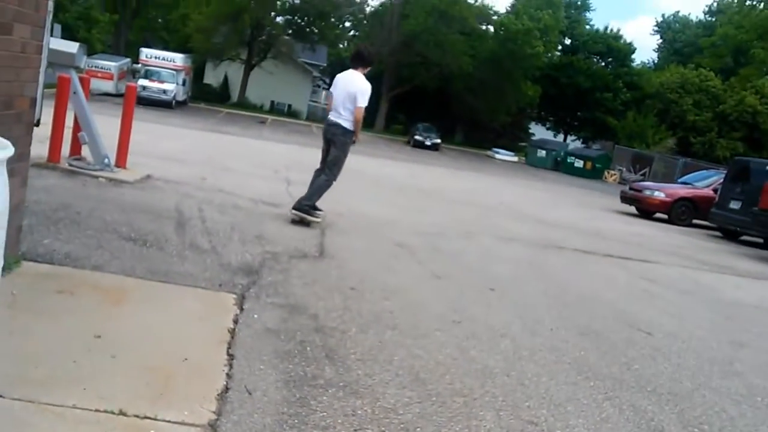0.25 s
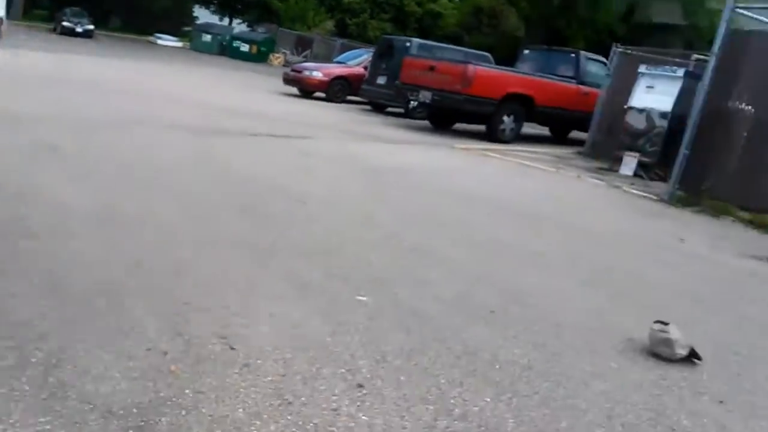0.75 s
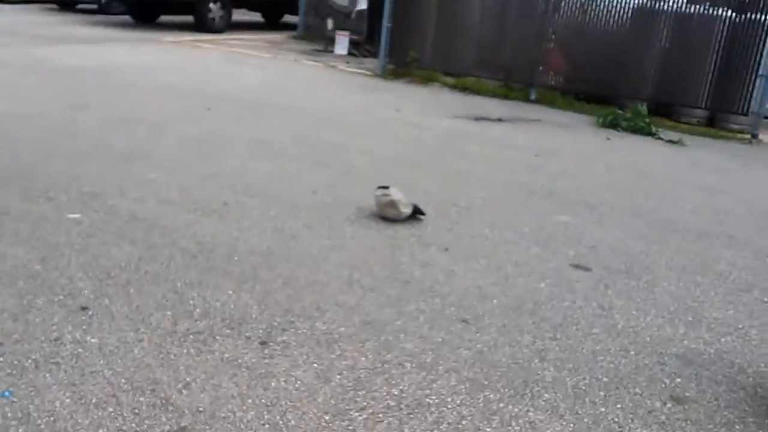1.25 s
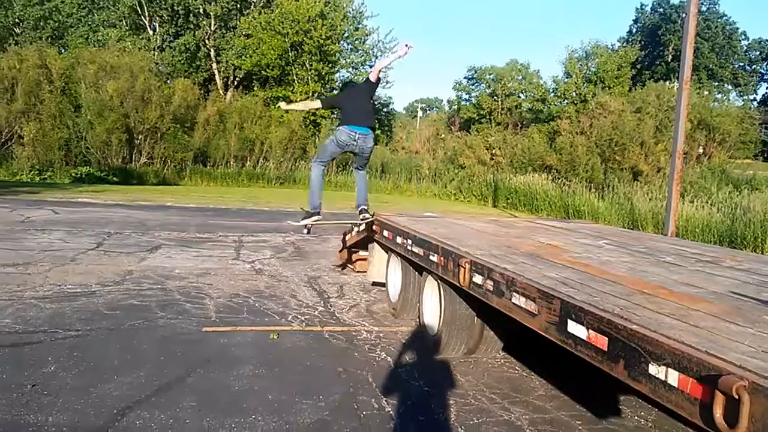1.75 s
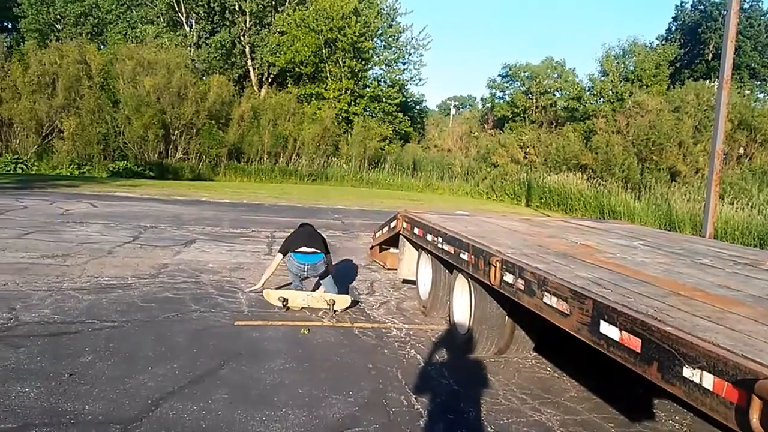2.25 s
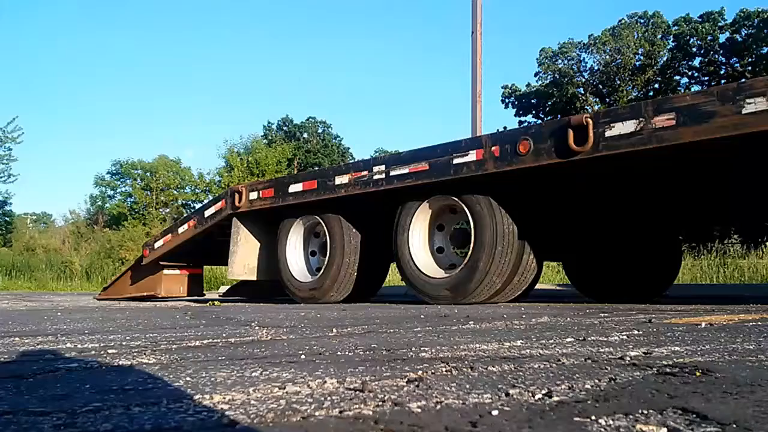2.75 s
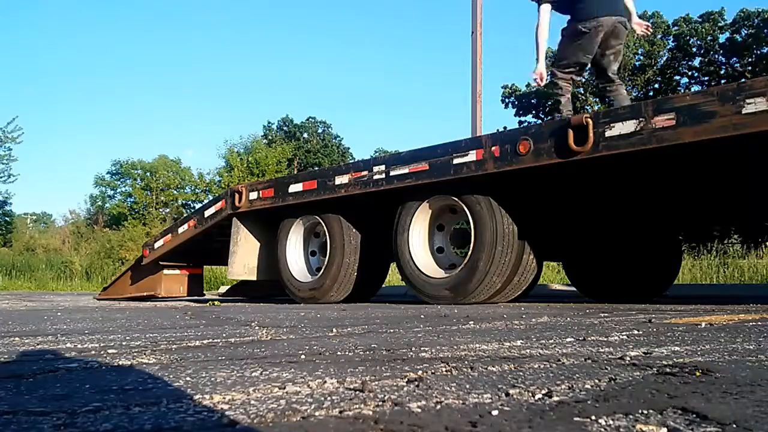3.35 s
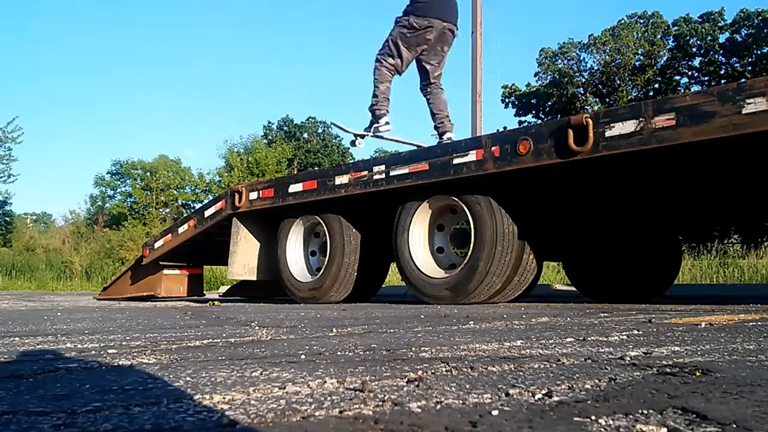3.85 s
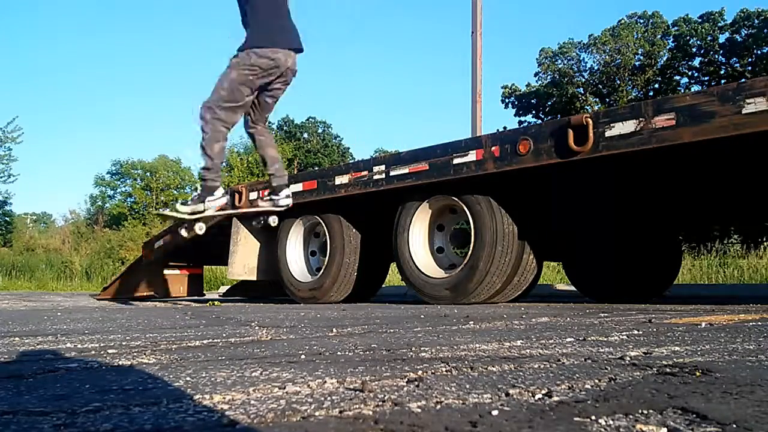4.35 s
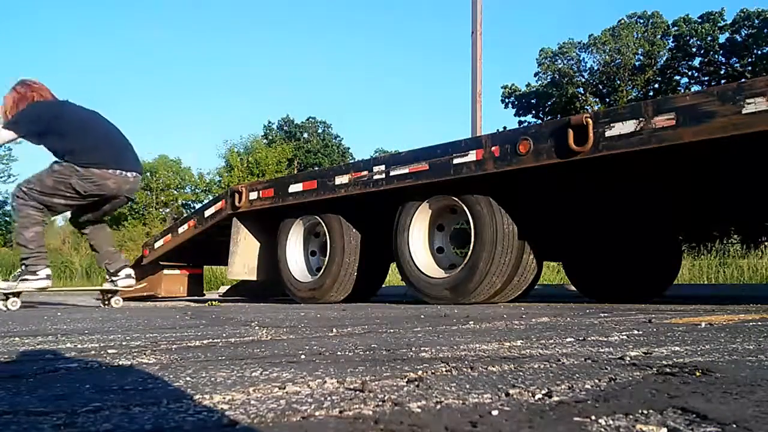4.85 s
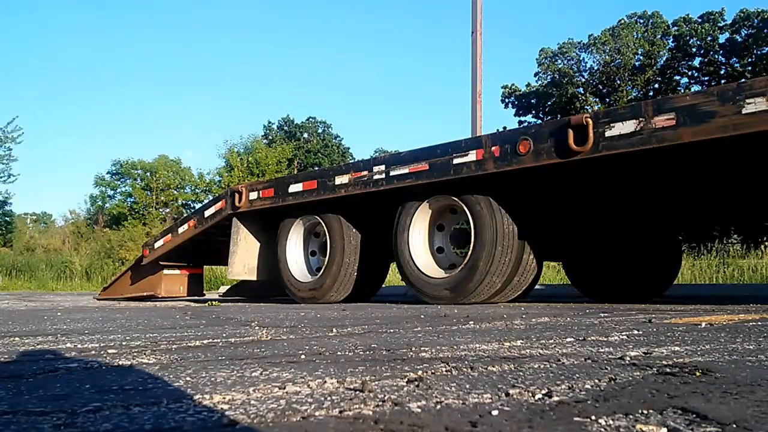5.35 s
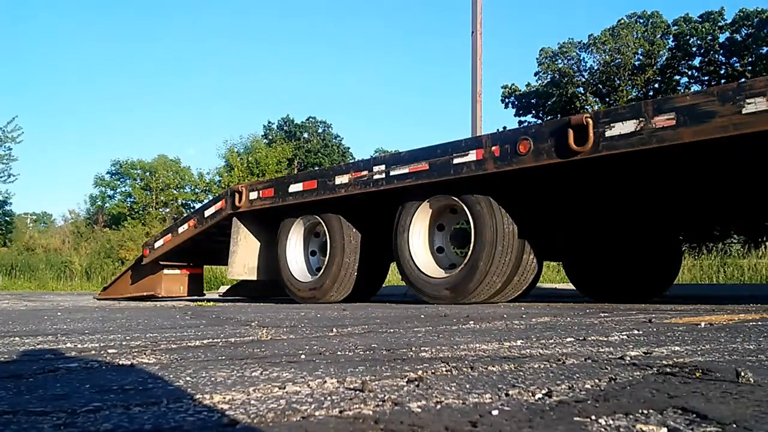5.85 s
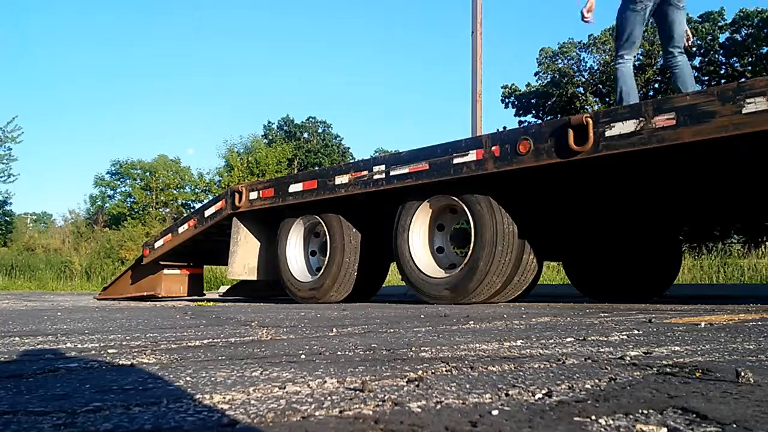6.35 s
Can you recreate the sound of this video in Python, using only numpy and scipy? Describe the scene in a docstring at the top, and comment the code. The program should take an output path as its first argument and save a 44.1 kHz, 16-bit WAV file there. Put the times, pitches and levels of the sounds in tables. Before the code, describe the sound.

Skateboard wheels roar over rough asphalt, knocks crack up close, silence, then clattering falls, plank rumble, a hard slamming landing and rolling away in wind.

```python
"""Skateboarding in a parking lot

Four passages joined by hard cuts, with silence after the first. Wheels roll on coarse asphalt (random
impacts, coloured and combed by a ground bounce) while knocks sound near the microphone; a rider lands and
falls; a board rumbles along a flatbed trailer's planks (noise through wooden resonances), pops off, slams
down (noise bursts and ringing modes) and rolls away; the next run starts.
Wind gusts run throughout; a murmur of air and a meadow's high hiss join after the silence (filtered noise)."""
import sys
import numpy as np
from scipy import signal
from scipy.fft import rfft, irfft, next_fast_len
from scipy.io import wavfile
from scipy.ndimage import uniform_filter1d, map_coordinates

SR = 44100
rng = np.random.default_rng(int(sys.argv[2]) if len(sys.argv) > 2 else 0)


def digitize_waveform(pressure):
    """Quantize a signal to 16-bit integers and store it at the path in sys.argv[1].

    Rows of a 2-D input are taken as channels; values are limited to [-1, 1].
    """
    field = np.atleast_2d(pressure).T
    bounded = np.clip(field, -1, 1)
    quanta = np.round(bounded * 32767).astype(np.int16)
    wavfile.write(sys.argv[1], SR, quanta)


N = 291499

# cuts [s]: the first passage ends, the second, third and fourth start
LOT_END, FALL_START, RUN_START, NEXT_START = 1.548, 2.099, 2.777, 5.778
# the hard landing, truck by truck and foot by foot: (time [s], level [dB], body relative to level [dB])
LANDING = [(4.5995, -6, -3), (4.604, -12.5, 6.5), (4.615, -6.5, 3.5), (4.620, -9, 2.5), (4.628, -12, 10.5),
           (4.66, -25, 12)]
# modes of board and trucks: (frequency [Hz], relative level [dB], t60 [s])
BOARD = [(587, -2.5, 0.058), (668, -3.5, 0.14), (892, -1.5, 0.031), (1040, -11, 0.044), (1496, -2.5, 0.15),
         (1698, -3, .1), (2062, -1, 0.052), (2650, -6.5, 0.043), (3290, -5.5, 0.15), (4020, -11.5, .08),
         (4300, -9.5, 0.23), (4750, -10.5, 0.15), (5110, -7, .17)]
# spectrum of crunching grit: (frequency [Hz], relative density [dB])
GRIT = [(700, -8), (1500, 5.5), (2600, -1), (3500, -0.5), (4700, 0), (5600, -6.5), (6800, -25.5),
        (10000, -39), (15500, -58)]
# spectrum of a dull woody body: (frequency [Hz], relative density [dB])
BODY = [(50, -11.5), (160, -5), (280, -3), (450, -2), (620, 4), (770, 0), (940, 2), (1270, -9.5),
        (1500, -10), (2100, -15.5), (2700, -26.5), (12000, -73.5)]


def amp(db):
    """Level law: decibels to an amplitude ratio."""
    return 10 ** (np.asarray(db) / 20)


def unit(x):
    """Normalization: scale to an rms of 1."""
    return x / np.sqrt(np.mean(x ** 2) + 1e-20)


def along(points, hz):
    """Interpolation of (frequency [Hz], value) points on a logarithmic frequency axis."""
    f, v = np.transpose(points)
    return np.interp(np.log(hz + 1), np.log(f), v)


def curves(rows):
    """Linear interpolation in time: one value per sample for each column after the time."""
    s, *columns = np.transpose(rows)
    return [np.interp(np.arange(N) / SR, s, column) for column in columns]


def shot(start, end):
    """Gating: 1 between two moments [s], 0 outside, with edges smoothed over 64 samples."""
    t = np.arange(N) / SR
    return uniform_filter1d(1. * ((t >= start) & (t < end)), size=64)


def wobble(rate):
    """Slow random modulation: a smooth curve through rate random knots a second."""
    knots = rng.standard_normal(int(N * rate / SR) + 4)
    return map_coordinates(knots, [np.arange(N) * rate / SR])


def coloured(x, spectrum):
    """Minimum-phase filtering: the cepstrum folded to positive times makes a causal, unit-power filter."""
    size = 8192
    gain = amp(along(spectrum, np.fft.rfftfreq(size, 1 / SR)))
    cepstrum = irfft(np.log(unit(gain)))
    cepstrum[1:size // 2] *= 2
    cepstrum[size // 2 + 1:] = 0
    impulse_response = irfft(np.exp(rfft(cepstrum)))
    return signal.fftconvolve(x, impulse_response)[:len(x)]


def noise():
    """White noise: equal power at all frequencies, about rms 1."""
    return rng.standard_normal(N)


def stones(rate, spread_db):
    """Shot noise: tiny impacts of random size, about rate a second, at rms 1."""
    struck = rng.random(N) < rate / SR
    return unit(struck * noise() * amp(spread_db * noise()))


def bursts(rows):
    """Exponential decay: dying noise bursts (time [s], level [dB], t60 [s])."""
    out, t = np.zeros(N + SR), np.arange(SR // 2) / SR
    for s, db, t60 in rows:
        decay = amp(db - 60 * t / max(t60, .003))
        out[round(s * SR):][:len(t)] += decay * rng.standard_normal(len(t))
    return out[:N]


def ringing(rows, modes, scatter_db, blur):
    """Modal excitation: blows (time [s], level [dB]) ring the modes; shifting contact blurs their pitch."""
    out, t = np.zeros(N + SR), np.arange(SR // 2) / SR
    hz, level, t60 = np.transpose(modes)[:, :, None]
    for s, db in rows:
        strength = amp(db + level + scatter_db * rng.standard_normal(hz.shape))
        size = strength * rng.choice([-1, 1], hz.shape)
        steps = rng.standard_normal((len(hz), len(t)))
        drift = blur * np.sqrt(hz / SR) * np.cumsum(steps, axis=1)  # random walk of phase
        partials = size * amp(-60 * t / t60) * np.sin(2 * np.pi * hz * t + drift)
        out[round(s * SR):][:len(t)] += np.sum(partials, axis=0)
    return out[:N]


def drone(hz, width_hz):
    """Amplitude modulation: slow complex noise carried on a given pitch becomes a narrow band."""
    carrier = np.exp(2j * np.pi * np.cumsum(hz) / SR)
    return unit(np.real((wobble(width_hz) + 1j * wobble(width_hz)) * carrier))


def swells(rows, rise_db_per_s, fall_db_per_s):
    """Power summation of gains (time [s], hold [s], level [dB]): each rises, holds and dies away."""
    t = np.arange(N) / SR
    power = 0
    for s, hold, db in rows:
        rise_db = -rise_db_per_s * np.maximum(s - t, 0)
        fall_db = -fall_db_per_s * np.maximum(t - s - hold, 0)
        power = power + amp(db + rise_db + fall_db) ** 2
    return np.sqrt(power)


def outdoors():
    """Turbulence noise: gusts buffet the microphone over its hiss; later air murmurs and a meadow hisses."""
    # gusts on the microphone: (time [s], hold [s], level [dB])
    gusts = [(.65, .6, -41.5), (2.2, .5, -39.5), (3.02, .6, -31.5), (4.05, 0.26, -30.5),
             (4.85, 0.11, -36.5), (5.71, .1, -36), (6.06, 0.61, -24.5)]
    # swells of the meadow's hiss: (time [s], hold [s], level [dB])
    hiss_swells = [(3.4, 0.91, -62.5), (4.48, 0.8, -53.5)]
    # spectra of wind buffeting, meadow hiss and murmuring air: (frequency [Hz], relative density [dB])
    buffet_spectrum = [(18, -45.5), (30, -21), (42, -7), (58, 6), (85, 4.5), (130, 1), (250, -4.5),
                       (600, -66.5)]
    meadow_spectrum = [(2800, -21), (3900, -9), (4700, 7), (5300, 0.5), (5900, -9), (6800, -38),
                       (10000, -47)]
    air_spectrum = [(60, 7.5), (400, 9.5), (900, 5.5), (1600, -2), (2900, -7.5), (5000, -7), (7000, -28),
                    (15500, -42.5)]
    calm_db, meadow_db = -41.5, -63.5  # floors between the gusts and between the hiss swells
    buffet = np.hypot(amp(calm_db), swells(gusts, rise_db_per_s=92, fall_db_per_s=66))
    hiss = np.hypot(amp(meadow_db), swells(hiss_swells, rise_db_per_s=119, fall_db_per_s=89))
    wind = buffet * amp(0.62 * wobble(15)) * unit(coloured(noise(), buffet_spectrum))
    meadow = hiss * amp(0.78 * wobble(8.7)) * coloured(noise(), meadow_spectrum)
    murmur = amp(-48.5) * coloured(noise(), air_spectrum)
    self_noise = amp(-66.5) * noise()
    return wind + self_noise + shot(FALL_START, N / SR) * (meadow + murmur)


def yard(x):
    """Diffuse reverberation: scattered echoes from trailer, walls and trees, 9 ms after the sound."""
    # reverberation time: (frequency [Hz], t60 [s])
    echo_t60 = [(150, .4), (1000, 0.36), (5000, 0.15), (10000, .15)]
    hz, t, z = signal.stft(rng.standard_normal(SR // 2), SR, nperseg=256)
    decay = amp(-60 * t / along(echo_t60, hz)[:, None])
    tail = signal.istft(z * decay, SR, nperseg=256)[1]
    delayed = np.pad(x, (round(0.009 * SR), 0))
    return signal.fftconvolve(delayed, tail / np.linalg.norm(tail))[:N]


def near_knocks():
    """Impact excitation: sharp cracks and hollow thocks close by, each with a low ringing thud."""
    # knocks: (time [s], crack level [dB], thock level [dB], thud level [dB], t60 of crack and thock [s])
    knocks = [(1.122, -1, -12, -3.5, 0.011), (1.130, -11, -12, -3.5, 0.05), (1.1331, -21, -29.5, -16, 0.2),
              (1.154, -19.5, -25.5, -15.5, .07), (1.1629, -10.5, -3.5, -11.5, 0.019)]
    # what rings in the knocks: (frequency [Hz], relative level [dB], t60 [s])
    knock_modes = [(105, -2.5, 0.055), (140, -7.5, 0.015), (3940, -18.5, 0.058)]
    # spectra of crack and thock: (frequency [Hz], relative density [dB])
    crack_spectrum = [(100, -10.5), (400, -3.5), (1100, 3.5), (2000, 1), (3000, -0.5), (4300, -3.5),
                      (6000, -14.5), (8000, -24), (11000, -36), (15500, -52.5)]
    thock_spectrum = [(60, -13), (230, 5), (450, 3.5), (900, 2), (1500, -12), (3000, -26.5), (15000, -66)]
    s, crack_db, thock_db, thud_db, t60 = np.transpose(knocks)
    crack = coloured(bursts(zip(s, crack_db, t60)), crack_spectrum)
    thock = coloured(bursts(zip(s, thock_db, t60)), thock_spectrum)
    thud = ringing(zip(s, thud_db), knock_modes, scatter_db=1, blur=.1)
    return crack + thock + thud


def lot_roll():
    """Comb interference: a delayed ground bounce colours the roar of wheels that chatter and scrub on stones."""
    # wheels scrub sideways in the turns: (time [s], hold [s], grit level [dB], squeal level [dB])
    turns = [(0.03, 0.027, -26.5, -23), (.1, .36, -34.5, -38.5), (0.495, 0.18, -35.5, -27.5),
             (1.252, 0.21, -44, -50.5), (1.47, 0.082, -39.5, -55.5)]
    # lag of the ground bounce as the rider moves: (time [s], lag [ms])
    ground_lag = [(0, 2.43), (.6, 2.57), (.85, 2.22), (1.15, 2.23), (1.55, 2.28)]
    # pitch of the scrubbing wheels: (time [s], frequency [Hz])
    scrub_pitch = [(.07, 1480), (.35, 1250), (.62, 1230), (0.799, 1328)]
    # spectra of roar and grit: (frequency [Hz], relative density [dB])
    roar_spectrum = [(30, -21.5), (70, -26), (130, -1), (220, -1.5), (320, 5), (430, -2.5), (560, -8.5),
                     (820, -3.5), (1000, -3), (1300, -6), (2000, -12.5), (2600, -48.5), (9000, -90)]
    grit_spectrum = [(600, -8.5), (1300, 7.5), (2100, 1.5), (2700, -1.5), (4300, 2), (5300, -5.5),
                     (6600, -27), (9000, -20), (12000, -37.5), (15500, -51)]
    start_roar_db, start_grit_db, recede_db_per_s = -25, -44, 6.5  # fading with distance
    t = np.arange(N) / SR
    recede_db = -recede_db_per_s * t
    s, hold, grit_db, squeal_db = np.transpose(turns)
    scrub = swells(zip(s, hold, grit_db), rise_db_per_s=197, fall_db_per_s=132.5)
    squeal = swells(zip(s, hold, squeal_db), rise_db_per_s=198, fall_db_per_s=131)
    squeal = squeal * drone(curves(scrub_pitch)[0], width_hz=220)
    chatter = amp(1.54 * wobble(44.45) + 1.8 * wobble(130))
    direct = unit(coloured(stones(rate=3200, spread_db=0), roar_spectrum))
    lag_s = curves(ground_lag)[0] / 1000
    bounce = map_coordinates(direct, [(t - lag_s) * SR])
    share = np.minimum(0.092 + .2 * t, 1)  # the bounce gains on the direct sound with distance
    combed = (direct + share * bounce) / np.hypot(1, share)
    roar = combed + amp(-7.5) * drone(2 / lag_s, width_hz=65)  # the comb's second peak drones
    grit = coloured(stones(rate=10000, spread_db=-2.5), grit_spectrum)
    roar_gain = np.hypot(amp(start_roar_db + recede_db), amp(5.5) * scrub)
    grit_gain = np.hypot(amp(start_grit_db + recede_db), scrub)
    return chatter * (roar_gain * roar + grit_gain * grit + squeal)


def ground_roll():
    """Friction on rough ground: rolling wheels and scrubbing shoes crunch grit, which rings the board."""
    # the board rolls on the asphalt: (time [s], hold [s], roar level [dB], grit level [dB])
    rolls = [(2.101, .6, -48.5, -47), (4.66, 0.96, -36, -59)]
    # shoes and wheels scrape the asphalt: (time [s], hold [s], roar level [dB], grit level [dB])
    scrapes = [(2.191, 0.032, -42, -32), (2.608, 0.021, -40.5, -45), (4.66, 0.016, -36, -36.5),
               (4.727, 0.023, -24, -31), (4.917, 0.046, -35, -42), (5.535, 0.04, -30.5, -38)]
    # spectrum of the roar: (frequency [Hz], relative density [dB])
    away_spectrum = [(60, -19), (150, -3), (400, 2), (620, 3), (900, -3), (1300, -12.5), (2200, -27.5),
                     (8000, -84.5)]
    s, hold, roar_db, grit_db = np.transpose(rolls + scrapes)
    roar = swells(zip(s, hold, roar_db), rise_db_per_s=224, fall_db_per_s=202)
    grit = swells(zip(s, hold, grit_db), rise_db_per_s=255, fall_db_per_s=172)
    crunch = grit * stones(rate=5100, spread_db=-2.0)
    low = roar * coloured(stones(rate=3300, spread_db=0.5), away_spectrum)
    board = ringing([(0, 0)], BOARD, scatter_db=1, blur=.15)  # impulse response
    board_ring = signal.fftconvolve(crunch, unit(board) / np.sqrt(N))[:N]
    high = coloured(crunch, GRIT) + amp(-7.5) * board_ring
    on_ground = shot(FALL_START, RUN_START) + shot(LANDING[0][0], NEXT_START)
    return on_ground * amp(0.7 * wobble(40)) * (low + high)


def planks(x):
    """Modal response: the deck answers a force with broad, damped wooden resonances."""
    # resonances: (frequency [Hz], bandwidth [Hz], relative level [dB])
    resonances = [(117.1, 25, -3.5), (167.8, 40, -4), (268, 45, -8), (368.4, 55, 0), (436, 41, 1),
                  (492.5, 60, -4), (617, 42, -5), (797, 62, -12), (1012, 64, -17)]
    t = np.arange(SR // 4) / SR
    response = np.zeros(len(t))
    for k, (hz, width, db) in enumerate(resonances):
        decay = width * np.exp(-np.pi * width * t)
        response += (-1) ** k * amp(db) * decay * np.sin(2 * np.pi * hz * t)
    return signal.fftconvolve(x, response / np.linalg.norm(response))[:N]


def deck_roll():
    """Forced vibration: wheels drum on planks, louder as they near, and thump at joints; grit crunches."""
    # runs: (start [s], wheels lift [s], rumble level at the start [dB], growth [dB/s])
    runs = [(2.774, 4.021, -16, 2.5), (5.773, 6.495, -26, 16)]
    # wheels drop into plank joints, the tail strikes the deck: (time [s], relative level [dB])
    joint_thumps = [(2.778, -9), (2.812, -7.5), (2.856, -7.5), (2.89, -2.5), (2.93, -9), (3.111, -12),
                    (3.163, -4.5), (3.302, -5), (3.433, -14.5), (3.507, -2.5), (3.556, -1.5), (3.595, -9),
                    (3.702, -1.5), (3.775, -3.5), (3.886, 1), (3.958, -2), (3.991, -1.5), (5.784, -10.5),
                    (5.809, -9), (6.147, -3.5), (6.186, 3.5), (6.415, -2)]
    # spectrum of the dull deck: (frequency [Hz], relative density [dB])
    deck_spectrum = [(35, -30), (70, -13.5), (130, -6.5), (300, -1.5), (420, 1.5), (650, -9), (1050, -19.5),
                     (1350, -30), (2500, -48), (9000, -95)]
    fade_db_per_s, grit_db = 71.5, -29  # ring-out once the wheels lift; grit against the load
    t = np.arange(N) / SR
    load = 0
    for start, lift, db, growth in runs:
        growth_db = growth * (np.minimum(t, lift) - start)
        fade_db = -fade_db_per_s * np.maximum(t - lift, 0)
        load = load + shot(start, N / SR) * amp(db + growth_db + fade_db)
    force = load * amp(.9 * wobble(35))
    thumps = bursts([(s, db - 11.0, .17) for s, db in joint_thumps])
    wood = planks(amp(-7.5) * force * stones(rate=2500, spread_db=0.5) + amp(4.0) * thumps)
    body_force = amp(-2.5) * force * stones(rate=3000, spread_db=-1.5) + amp(-4) * thumps
    body = coloured(body_force, deck_spectrum)
    crunch = amp(grit_db + 2.2 * wobble(50)) * load * stones(rate=7000, spread_db=-4.0)
    grit = coloured(crunch + amp(-24) * thumps, GRIT)
    return wood + body + amp(-7.5) * coloured(thumps, BODY) + grit


def rider_thuds():
    """Low-mode excitation: soft thuds ring two deep modes as the rider's weight comes down."""
    # thuds: (time [s], level [dB])
    weight_drops = [(2.549, -26.5), (4.87, -23.5), (5.03, -23.5), (5.70, -22)]
    # modes: (frequency [Hz], relative level [dB], t60 [s])
    low_modes = [(57, 1.5, .25), (104, -10, .12)]
    return ringing(weight_drops, low_modes, scatter_db=1, blur=.1)


def board_hits(rows, crack_t60, knock_t60, ring_db):
    """Impact and modal decay: each contact is a snap, a bright crack, a woody knock and a board ring."""
    # spectrum of snap and crack: (frequency [Hz], relative density [dB])
    crack_spectrum = [(400, -22.5), (1100, -4.5), (2000, 4), (3000, 1.5), (4800, 5), (5700, -1),
                      (6700, -14), (10000, -31.5), (15500, -51.5)]
    s, db, body_db = np.transpose(rows)

    def dying(level, t60):
        """Exponential decay: one noise burst per contact."""
        return bursts((at, size, t60) for at, size in zip(s, level))

    crack = coloured(dying(db, 0.01) + dying(db - 6.0, crack_t60), crack_spectrum)
    knock = coloured(dying(db + body_db, knock_t60), BODY)
    ring = ringing(zip(s, db + ring_db), BOARD, scatter_db=2, blur=.2)
    return crack + knock + ring


def scene():
    """Superposition: all sources add up across the four passages, silent between the first two."""
    # wood and trucks hit something hard: (time [s], relative level [dB], body relative to level [dB])
    contacts = [(.051, -16.5, 7), (.657, -25.5, 14.5), (.982, -28, 0.5), (1.486, -25.5, -4),
                (2.1006, -9.5, -6.5), (2.1144, -11, -5), (2.133, -17, 1), (2.229, -11, -10),
                (2.394, -24, -5), (2.493, -23, -5.5), (2.548, -21.5, -5.5), (2.653, -21, -2.5),
                (3.551, -21, 3.5), (3.9605, -14.5, 13), (4.1055, -11, 5), (4.3974, -28.5, 5.5),
                (5.216, -26.5, 1), (5.6625, -13.5, -1.5), (5.675, -20.5, -5), (5.704, -28.5, -3.5),
                (5.812, -22, -11), (6.187, -21, 15.5), (6.414, -27, 20)]
    clacks = amp(-8.5) * board_hits(contacts, crack_t60=0.13, knock_t60=0.13, ring_db=-12.5)
    landing = board_hits(LANDING, crack_t60=.075, knock_t60=0.067, ring_db=-11)
    echoes = amp(-15.0) * yard(clacks) + amp(-10.5) * yard(landing)
    hits = clacks + landing + rider_thuds() + echoes
    rolling = shot(0, LOT_END) * lot_roll() + deck_roll() + ground_roll()
    audible = 1 - shot(LOT_END, FALL_START)
    return (audible * (rolling + near_knocks() + hits + outdoors()))[None]


def record(dry):
    """Band limiting and saturation: the lowest bass is shed, loud peaks clip, the top band is removed."""
    top_hz = 15700
    lean = signal.sosfilt(signal.butter(4, 40, "highpass", fs=SR, output="sos"), dry)
    clipped = lean / (1 + np.abs(lean) ** 8) ** (1 / 8)
    m = next_fast_len(N + SR // 2)
    kept = np.fft.rfftfreq(m, 1 / SR) < top_hz
    return irfft(rfft(clipped, m) * kept, m)[..., :N]


dry = scene()
out = record(dry)
digitize_waveform(out)
```